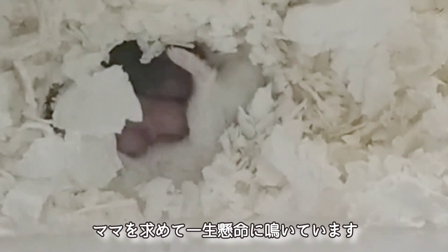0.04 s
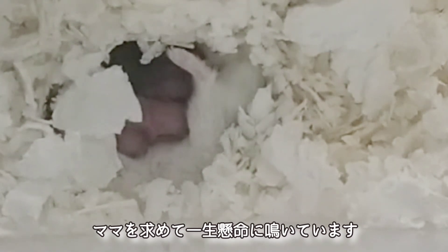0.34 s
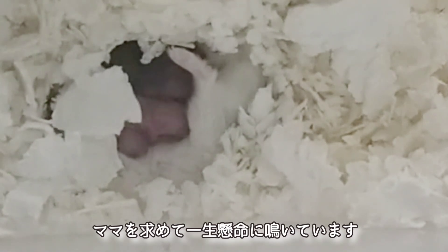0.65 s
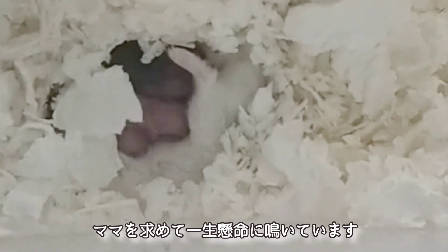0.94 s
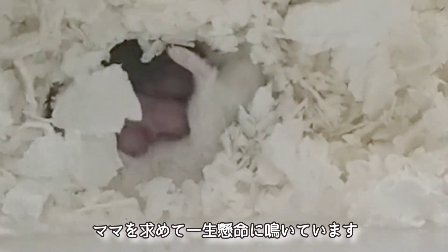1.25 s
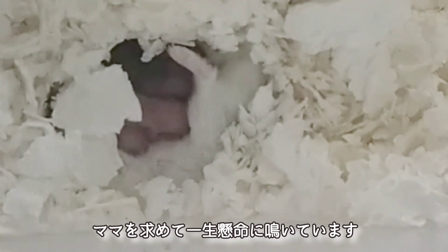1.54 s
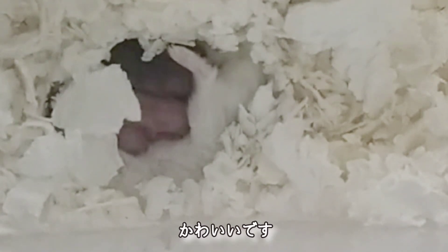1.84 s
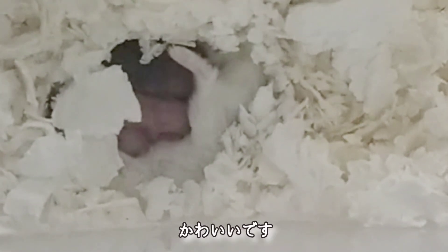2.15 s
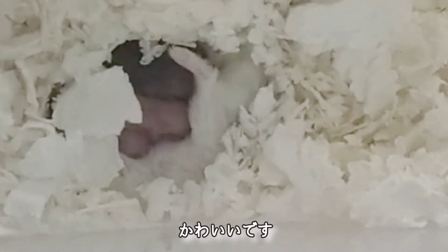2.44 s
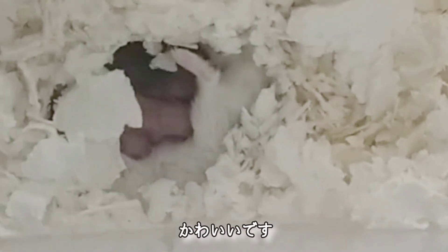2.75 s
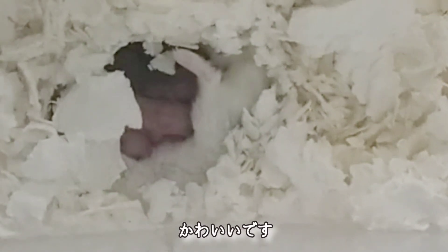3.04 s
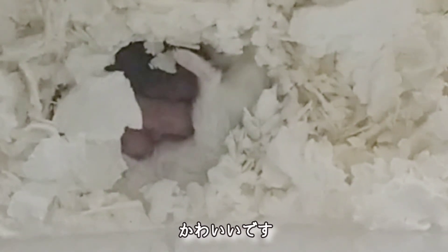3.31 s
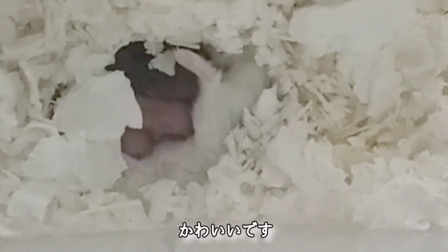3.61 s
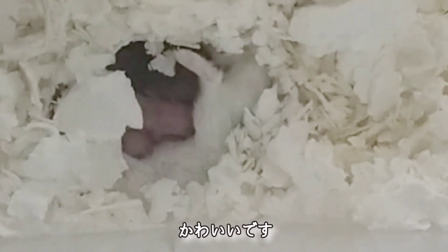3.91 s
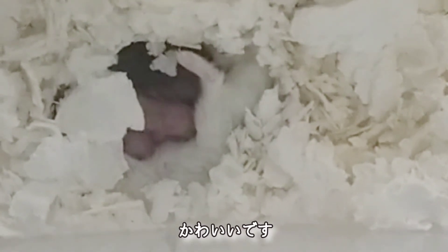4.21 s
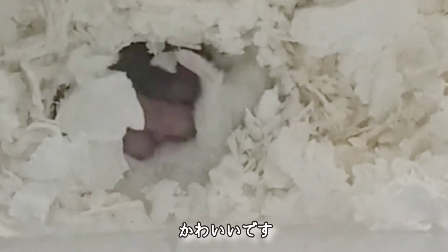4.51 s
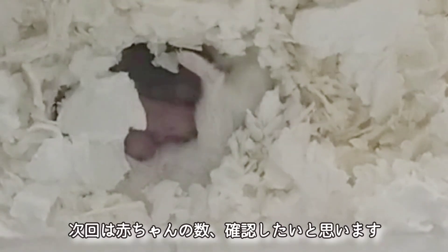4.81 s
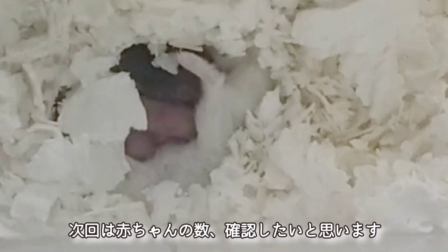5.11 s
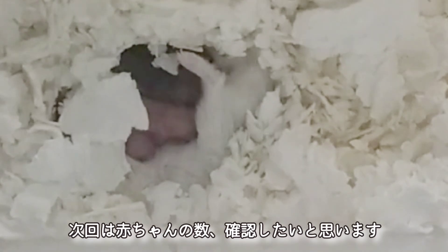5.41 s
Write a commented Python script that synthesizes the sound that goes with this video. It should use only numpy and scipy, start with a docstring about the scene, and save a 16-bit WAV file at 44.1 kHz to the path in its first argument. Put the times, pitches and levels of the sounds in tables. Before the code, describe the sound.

Over the steady low hum and light hiss of a room, tiny hamster pups squeak near the microphone. The calls start sparse and faint, then come several a second, each a thin scratchy rasp that often closes on a brief high whistle. They turn more strained and squealing midway, where a muffled bump sounds, and ease off near the end. Small mouth clicks dot the gaps.

```python
"""In a quiet, humming room, newborn hamster pups call from a nest of paper bedding, near a microphone.
A call starts as a rasp: air pushes the vocal folds into uneven snaps, which ring in the throat and mouth.
The folds may lock for a moment into a squeal, and they end on a short, pure whistle near 4 kHz.
Faint mouth clicks fall between the calls. Behind them are appliance hum, rumble, hiss and one dull bump."""
import sys
import numpy as np
from scipy import signal
from scipy.fft import rfft, irfft, next_fast_len
from scipy.io import wavfile
from scipy.ndimage import uniform_filter1d, map_coordinates

SR = 44100
rng = np.random.default_rng(int(sys.argv[2]) if len(sys.argv) > 2 else 0)


def put_to_file(sound):
    """Save the sound as 16-bit audio at rate SR, in the file named by the first command-line argument."""
    columns = np.atleast_2d(sound).T  # one column per channel
    safe = np.clip(columns, -1, 1)
    whole_steps = np.round(safe * 32767)
    wavfile.write(sys.argv[1], SR, whole_steps.astype(np.int16))


N = 249606

# The whistles that close the calls. Each row: start in seconds, end in seconds, top pitch in Hz,
# how much lower both ends are in Hz, level in dB.
WHISTLES = [ (0.415, 0.463, 4046, 60, -51), (0.78, .789, 4000, 30, -52), (1.289, 1.309, 4214, 50, -42.5),
            (1.666, 1.684, 4320, 35, -41.5), (1.995, 2.008, 4310, 20, -41.5),
            (2.33, 2.347, 3770, 63, -46.5), (2.813, 2.86, 4267, 135, -44.5),
            (3.143, 3.167, 4196, 40, -42.5), (3.721, 3.767, 4230, 190, -42.5),
            (4.088, 4.098, 4120, 40, -46), (4.347, 4.360, 4205, 23, -43.5), (4.674, 4.694, 4117, 30, -49),
            (4.973, 4.984, 3730, 29, -48.5), (5.284, 5.35, 4130, 81, -48.5), ]
# How throat and mouth shape the sound, relaxed and straining. Each row: frequency in Hz, level in dB.
RELAXED_THROAT = [(1050, -28.5), (1320, -8.5), (1650, -27), (1950, -9.5), (2400, -7), (2700, -16.5),
                  (2960, -1.5), (3550, -6), (4850, 0.5), (5170, -5), (5650, 3), (6350, -3), (6750, -11),
                  (7800, -12)]
STRAINED_THROAT = [(1000, -32.5), (1700, -17), (2350, -3), (2750, -16), (2950, -4), (3500, -7.5),
                   (4750, -0.5), (5100, -1.5), (5380, 0), (5650, -3.5), (6100, -7.5), (6850, -0.5),
                   (7150, -5.5), (7500, -5)]


def amp(db):
    """Turn decibels into a number to multiply by."""
    return 10 ** (np.asarray(db) / 20)


def unit(x):
    """Scale x to an average strength (rms) of 1."""
    return x / np.sqrt(np.mean(x ** 2) + 1e-20)


def along(points, hz):
    """Read between rows of frequency and value, on a log frequency scale."""
    frequencies, values = np.transpose(points)
    return np.interp(np.log(hz + 1), np.log(frequencies + 1), values)


def wobble(rate):
    """A smooth curve through `rate` random values a second."""
    return map_coordinates(rng.standard_normal(N // 8), [np.arange(N) * rate / SR], mode="wrap")


def gate(t, start, end, rise, fall):
    """Fade from 0 to 1 after start, and back to 0 by end."""
    return np.sin(np.pi / 2 * np.clip(np.minimum((t - start) / rise, (end - t) / fall), 0, 1)) ** 2


def filtered(x, response):
    """Turn each frequency in x up or down by response(hz)."""
    size = next_fast_len(N + SR // 2)
    return irfft(rfft(x, size) * response(np.fft.rfftfreq(size, 1 / SR)), size)[..., :N]


def noise(spectrum):
    """Noise of strength 1 with the given balance of low and high."""
    return unit(filtered(rng.standard_normal(N), lambda hz: amp(along(spectrum, hz))))


def ring(spectrum, size=1024):
    """How a hollow with this spectrum rings after one tap."""
    cepstrum = irfft(np.log(amp(along(spectrum, np.fft.rfftfreq(size, 1 / SR)))))
    # move all the ringing to after the tap
    cepstrum[1:size // 2] *= 2
    cepstrum[size // 2 + 1:] = 0
    response = irfft(np.exp(rfft(cepstrum)))
    return response / np.linalg.norm(response)


def drone(hz, waver, rate):
    """A tone of strength 1 whose level and pitch wander."""
    swing = 1 - waver + waver * (wobble(rate) + 1j * wobble(rate))
    return unit(np.real(swing * np.exp(2j * np.pi * hz * np.arange(N) / SR)))


def appliance_hum():
    """An appliance hums in several wavering tones; one of them swells once."""
    # Each row: pitch in Hz, level in dB, amount of waver from 0 to 1, wavers per second.
    tones = [(60.2, -62, .6, 9), (72.1, -55, .42, 10), (100.1, -58.5, 0.33, 12), (126, -57, .95, 26),
             (300, -65, .35, 9), (811, -82, 1, 20)]
    # In order: pitch that swells in Hz, time in seconds, half length in seconds, rise in dB.
    swell_shape = (100, 1.42, .24, 6)
    swell_hz, at, half, rise_db = swell_shape
    swell_db = rise_db * np.exp(-((np.arange(N) / SR - at) / half) ** 2)
    return sum(amp(db + swell_db * (abs(hz - swell_hz) < 10)) * drone(hz, waver, rate)
               for hz, db, waver, rate in tones)


def bump():
    """One soft, dull bump: deep noise that comes and goes."""
    # In order: time in seconds, half length in seconds, level in dB.
    shape = (3.39, 0.047, -48)
    # The bump's tone. Each row: frequency in Hz, relative level in dB.
    colour = [(25, -12), (58, -2.5), (90, -11), (220, -19), (400, -47), (1000, -100)]
    at, half, db = shape
    return amp(db) * np.exp(-((np.arange(N) / SR - at) / half) ** 2) * noise(colour)


def room_noise(rumble_db=-53.5, air_db=-65):
    """The room's steady low rumble and soft hiss."""
    # The tone of each noise. Each row: frequency in Hz, relative level in dB.
    rumble = [(6, -4), (18, 3), (26, .5), (55, -5), (90, -12), (140, -4), (190, -9), (260, -19), (290, -12),
              (320, -12.5), (370, -21), (480, -35.5), (800, -80)]
    air = [(210, -36), (350, -3), (389, -10.5), (455, -2.5), (539, -6.5), (591, -8), (841, -8), (1180, -12),
           (1350, -11.5), (1730, -16), (3200, -21.5), (6930, -21.5), (8000, -25.5), (10400, -63),
           (17600, -120)]
    return amp(rumble_db) * noise(rumble) + amp(air_db) * noise(air)


def cage_echo(x, fade_s=.06, echo_db=-21):
    """The cage walls throw back a faint, short echo."""
    t = np.arange(SR // 5) / SR
    tail = rng.standard_normal(len(t)) * amp(-60 * t / fade_s)
    return amp(echo_db) * signal.fftconvolve(x, tail / np.linalg.norm(tail))[:N]


def mouth_clicks(fade_s=.02, fold_hz=4500, decay_s=.00025):
    """Single snaps ring in the mouth, each with a brief noisy tail."""
    # Each row: time in seconds, peak level in dB.
    clicks = [(0.2616, -52), (0.6432, -54), (0.7747, -55), (1.1804, -45), (1.186, -42.5), (1.861, -43),
              (2.6374, -52.5), (2.9691, -55.5), (3.2535, -56), (3.363, -58), (3.8211, -56.5),
              (4.2788, -41.5), (4.2911, -40), (4.3136, -38.5), (4.451, -55), (4.562, -42), (4.7686, -53.5),
              (5.0842, -57)]
    out, t = np.zeros(N + SR), np.arange(SR // 50) / SR
    snap = np.convolve(np.exp(-t / decay_s) * np.sin(2 * np.pi * fold_hz * t), ring(RELAXED_THROAT))
    for at, db in clicks:
        tail = .11 * amp(-60 * t / fade_s) * rng.standard_normal(len(t))
        click = np.convolve((t == 0) + tail, snap)
        out[round(at * SR):][:len(click)] += amp(db) * click / np.abs(click).max()
    return out[:N]


def whistles(sag_db=3.0, fall_s=.011, lean=.86):
    """The folds settle into a pure tone. Its pitch peaks early and its level sags as the air runs out."""
    # A weak overtone an octave up. Each row: frequency in Hz, level against the main tone in dB.
    octave = [(7500, -17.5), (8100, -33), (8600, -32.5)]
    t, out = np.arange(N) / SR, np.zeros(N)
    drift_hz, shimmer_db = 12 * wobble(110), .5 * wobble(90)
    for start, end, hz, arch_hz, db in WHISTLES:
        span = (t > start - .002) & (t < end + .002)
        arch = 2 * np.linspace(0, 1, span.sum()) ** lean - 1  # -1 to 1, with the top pitch at 0
        phase = 2 * np.pi * np.cumsum(hz - arch_hz * arch ** 2 + drift_hz[span]) / SR
        edges = gate(t[span], start - .002, end + .002, .003, fall_s)
        level = amp(db + shimmer_db[span] - sag_db * np.maximum(arch, 0)) * edges
        out[span] += np.sqrt(2) * level * (np.sin(phase) + amp(along(octave, 2 * hz)) * np.sin(2 * phase))
    return out


def breath(attack_db=4, attack_s=.005, close_db=4, close_s=.011, brighten=.7):
    """Each push of air swells and sags. Gives the rasp's strength, treble and mouth opening."""
    # Each row is one push: start, crest and end in seconds, then crest level, swell up to the crest,
    # treble and mouth opening in dB.
    pushes = [ (0.411, .411, .412, -52.5, 0.5, -10, 0.5), (.773, 0.778, .777, -54.5, 1, -12, -4),
              (1.136, 1.164, 1.175, -50, 3, -11.5, 2), (1.197, 1.232, 1.287, -45.3, 6, -9, 1.5),
              (1.498, 1.515, 1.552, -48, 1.5, -7, 1.5), (1.556, 1.596, 1.621, -45.8, 4, -5.5, 1.5),
              (1.623, 1.656, 1.663, -49.5, 1.5, -4, 1.5), (1.86, 1.896, 1.997, -48.8, 1.5, -6.5, 2),
              (2.211, 2.301, 2.344, -47.5, 1.5, -7, 0.5), (2.81, 2.812, 2.81, -45, 1, -14, -10),
              (3.07, 3.1, 3.139, -43.5, 3, -4.5, -1), (3.59, 3.645, 3.724, -44.2, 4.5, -5, -4),
              (3.936, 3.947, 3.99, -44.5, 6, -4.5, -1.5), (3.993, 4.028, 4.1, -45, 4.5, -6, -3),
              (4.321, 4.331, 4.36, -45.5, 2, -2, 2.5), (4.559, 4.615, 4.643, -45.8, 2, -3, 6),
              (4.646, 4.662, 4.673, -49, 1.5, -3, 5.5), (4.894, 4.955, 4.975, -51, 2, -3.5, 7.5),
              (5.178, 5.244, 5.28, -49.5, 2, -5, 6.5), ]
    t, rows = np.arange(N) / SR, np.array(pushes)
    current = np.maximum(np.searchsorted(rows[:, 0] - .001, t) - 1, 0)
    start, crest, end, peak_db, swell_db, treble_db, opening_db = rows[current].T
    before_crest = (crest - t) / np.maximum(crest - start, .001)
    after_crest = (t - crest) / np.maximum(end - crest, .001)
    slack_db = swell_db * np.minimum(np.maximum(before_crest, after_crest), 1)
    slack_db += attack_db * np.exp(-np.maximum(t - start, 0) / attack_s)  # a push starts weak
    closing_db = close_db * np.exp(-np.maximum(end - t, 0) / close_s)  # and dulls as it runs out
    sounding = gate(t, start - .001, end + .004, .0006, .002)
    # the snaps stop once the folds settle into a whistle
    settled = sum(gate(t, on - .002, off + .01, .004, .001) for on, off, *_ in WHISTLES)
    drive = sounding * np.sqrt(np.clip(1 - settled, 0, 1)) * amp(peak_db - slack_db)
    return drive, treble_db - brighten * slack_db - closing_db, opening_db


def fold_snaps(drive, per_second=850, full_db=-47, size_db=1.45, fold_hz=4500, spread=.14):
    """Each snap restarts the folds at a new pitch. A harder push makes snaps come faster and ring longer."""
    t = np.arange(N) / SR
    push = np.clip(drive / amp(full_db), .4, 1.3)
    # with a weak push the snaps bunch into little groups
    bunching = np.exp(.45 * wobble(900) + .9 * np.maximum(1 - push, 0) * wobble(350))
    onset = np.diff((drive > 0) * 1, prepend=0) > 0
    opening_snap = np.roll(onset, SR // 2000)
    count = np.cumsum(per_second * push * bunching / SR + opening_snap).astype(int)
    age = t - t[np.searchsorted(count, count)]  # seconds since the latest snap
    pitch, size = rng.standard_normal((2, N))[:, count]
    hz = fold_hz * np.exp(spread * pitch)
    decay_s = .00025 * (.5 + push)
    return amp(size_db * size) * np.exp(-age / decay_s) * np.sin(2 * np.pi * hz * age)


def throat(folds, treble_db, opening_db, treble_hz=5500, neutral_db=-6.0, low_hz=2700):
    """The throat shapes the snaps and a wider mouth lifts their low part. The level is then evened out."""
    # When the pup strains: start and end in seconds.
    strain = (2.1, 4.2)
    t = np.arange(N) / SR
    relaxed = signal.fftconvolve(folds, ring(RELAXED_THROAT))[:N]
    strained = signal.fftconvolve(folds, ring(STRAINED_THROAT))[:N]
    voice = np.where((t > strain[0]) & (t < strain[1]), strained, relaxed)
    treble = filtered(voice, lambda hz: 1 / (1 + (treble_hz / (hz + 1)) ** 20))
    low = filtered(voice, lambda hz: 1 / (1 + (hz / low_hz) ** 20))
    voice = voice + (amp(treble_db - neutral_db) - 1) * treble + (amp(opening_db) - 1) * low
    return voice / np.sqrt(np.abs(uniform_filter1d(voice ** 2, size=500)) + 1e-12)


def squeals(undertone_db=-2, jitter=.014):
    """The folds lock into a shaky tone with a lower one beneath. Gives the sound and how locked they are."""
    # Each row: start and end in seconds, first and last pitch in Hz, share of tone (held to 0.4-0.95).
    locks = [ (2.243, 2.245, 4197, 4253, 0.7), (2.261, 2.281, 4900, 4846, .65),
             (2.29, 2.297, 5230, 5250, .75), (2.308, 2.311, 5280, 5100, .85),
             (2.81, 2.815, 4430, 3950, 0.8), (3.087, 3.093, 5098, 5400, 0.87),
             (3.099, 3.111, 5300, 5490, .82), (3.114, 3.125, 4760, 4580, .88),
             (3.127, 3.144, 4470, 4300, 0.74), (3.623, 3.649, 5300, 5430, .72),
             (3.65, 3.657, 5375, 5400, .95), (3.668, 3.682, 4500, 4560, .5),
             (3.685, 3.688, 5350, 5460, .95), (3.944, 3.965, 4850, 5230, .55),
             (4.002, 4.025, 4940, 5300, .3), (4.028, 4.047, 4610, 4480, 0.57), ]
    # The folds repeat a pattern every few swings, which adds the lower tone.
    # Each row: lowest pitch in Hz, swings in the pattern.
    patterns = [(4780, 2), (4440, 3), (0, 7)]
    t, tone, locked = np.arange(N) / SR, np.zeros(N), np.zeros(N)
    tremor, flutter = 1 + jitter * wobble(600), amp(1.3 * wobble(400))
    for start, end, from_hz, to_hz, share in locks:
        span = (t > start - .0015) & (t < end + .0015)
        lock = np.clip(share, .4, .95) * gate(t[span], start - .0015, end + .0015, .002, .002)
        hz = np.interp(t[span], [start, end], [from_hz, to_hz]) * tremor[span]
        phase = 2 * np.pi * np.cumsum(hz) / SR
        middle_hz = (from_hz + to_hz) / 2
        ratio = 1 - 1 / next(swings for lowest, swings in patterns if middle_hz > lowest)
        undertone = amp(undertone_db + along(STRAINED_THROAT, ratio * middle_hz))
        tone[span] += np.sqrt(2 * lock) * (np.sin(phase) + undertone * np.sin(ratio * phase))
        locked[span] += lock
    return flutter * tone, locked


def rasps(swing_limit=4.0):
    """Breath drives the vocal folds, which pass between rough snaps and squeals."""
    drive, treble_db, opening_db = breath()
    squeal, locked = squeals()
    rough = throat(fold_snaps(drive), treble_db, opening_db)
    # the folds can swing only so far, so the largest snaps are rounded off
    swing = np.abs(signal.hilbert(rough, next_fast_len(N))[:N])
    rough = rough / (1 + (swing / swing_limit) ** 4) ** .25
    unlocked = np.clip(1 - locked, 0, 1) ** .85
    return drive * (unlocked * unit(rough) + squeal)


def scene():
    """The pups, their echo and the room, the same in both channels."""
    pups = rasps() + whistles() + mouth_clicks()
    mix = pups + cage_echo(pups) + appliance_hum() + bump() + room_noise()
    return np.tile(mix, (2, 1))


def record(dry, hiss_db=-89, top_hz=15460):
    """The microphone fades out near 8 kHz and adds faint electronic hiss. Nothing passes above top_hz."""
    # The microphone's treble loss. Each row: frequency in Hz, gain in dB.
    microphone = [(7600, -0.5), (8000, -10), (8400, -19.5), (9200, -56)]
    heard = filtered(dry, lambda hz: amp(along(microphone, hz))) + amp(hiss_db) * rng.standard_normal(N)
    return filtered(heard, lambda hz: hz < top_hz)


dry = scene()
out = record(dry)
put_to_file(out)
```